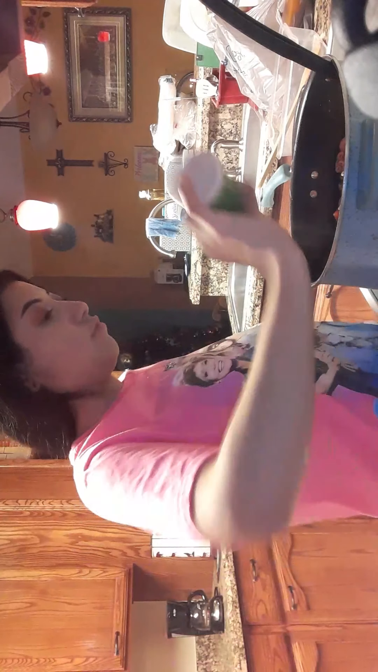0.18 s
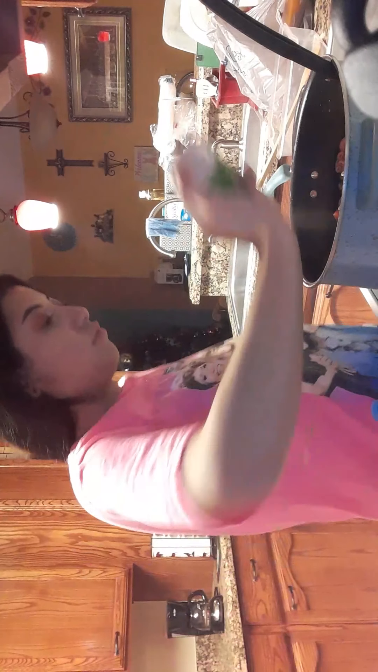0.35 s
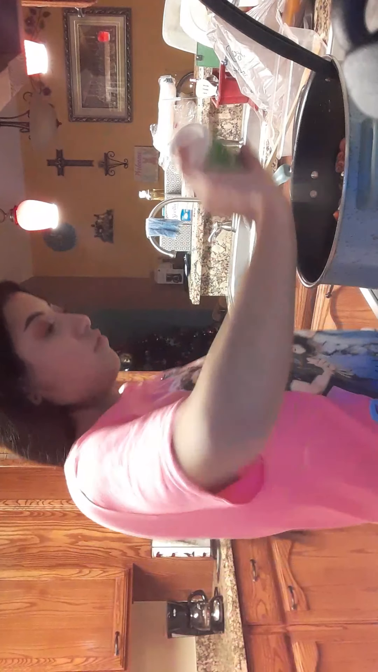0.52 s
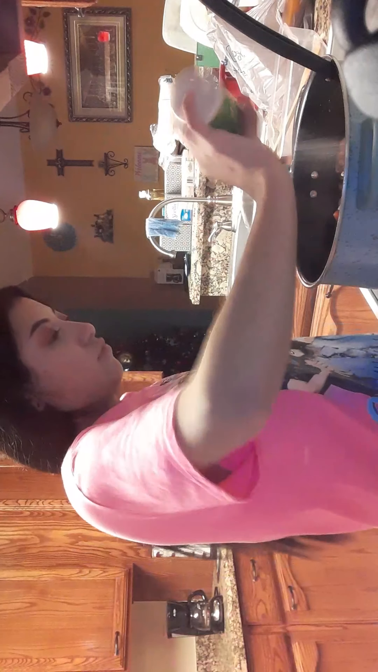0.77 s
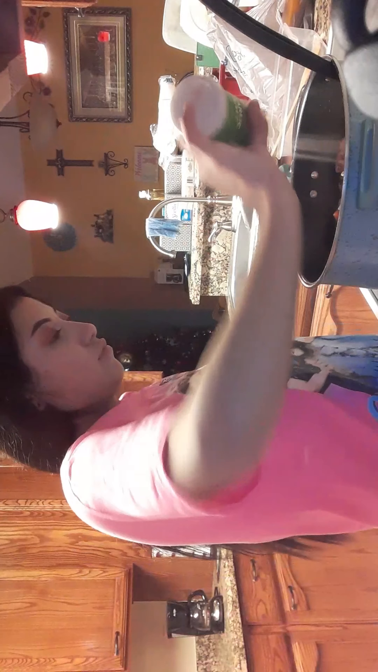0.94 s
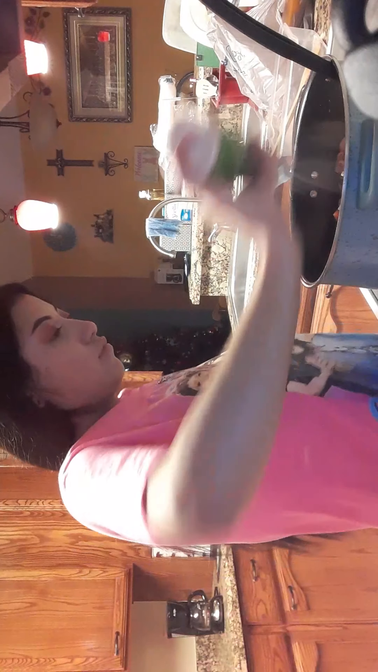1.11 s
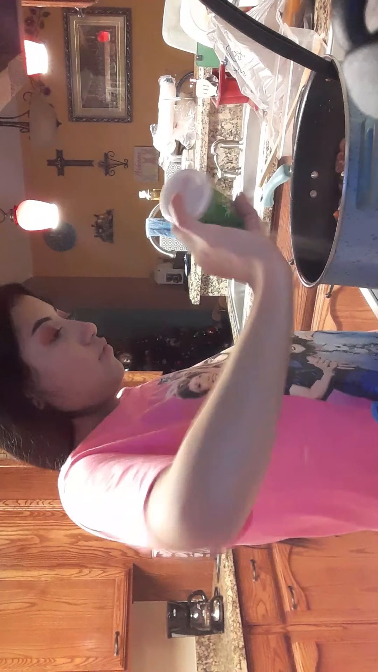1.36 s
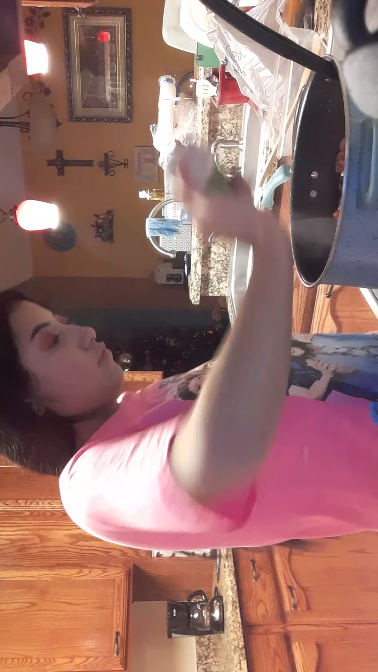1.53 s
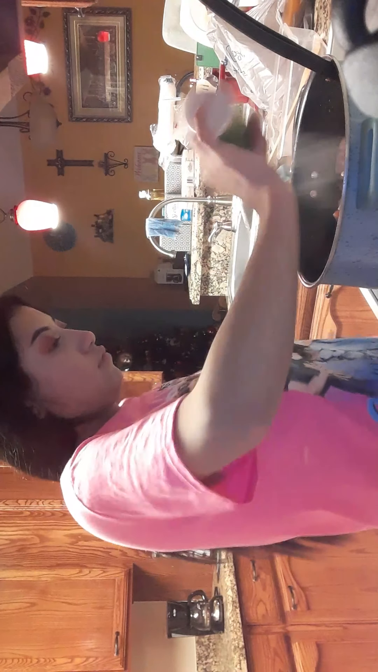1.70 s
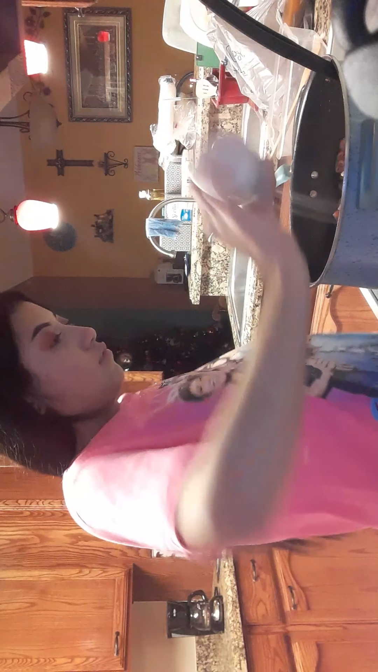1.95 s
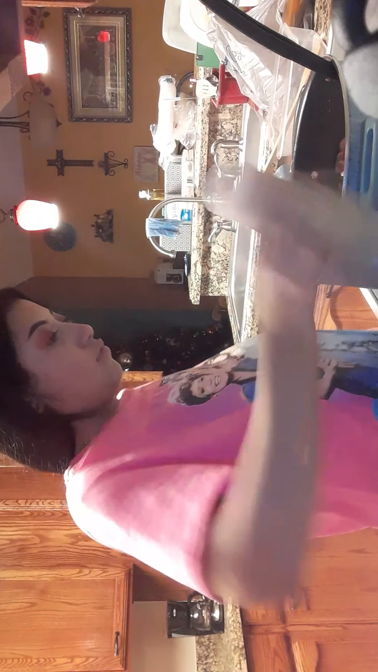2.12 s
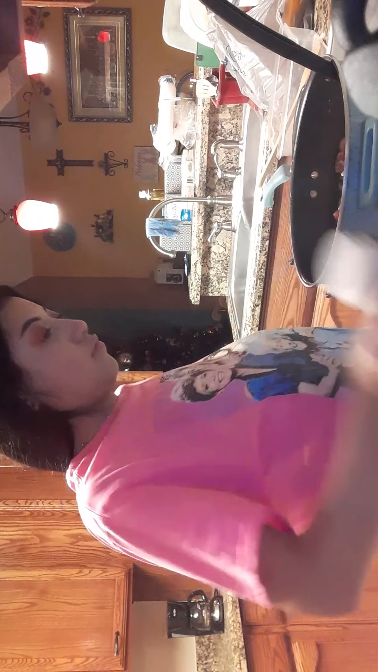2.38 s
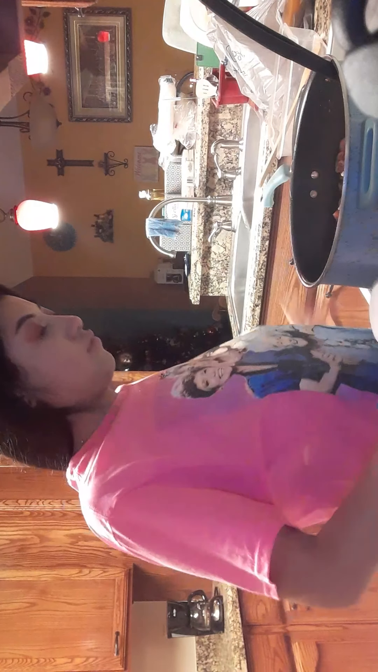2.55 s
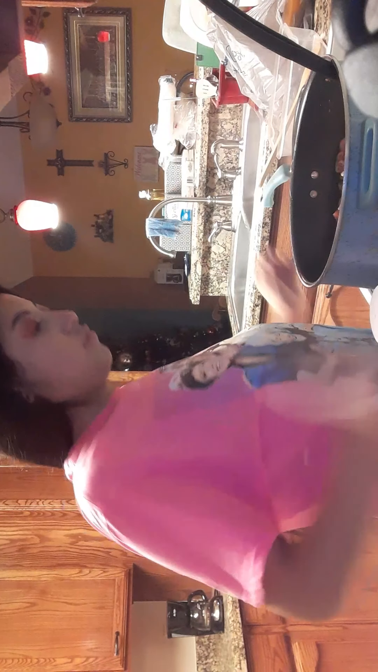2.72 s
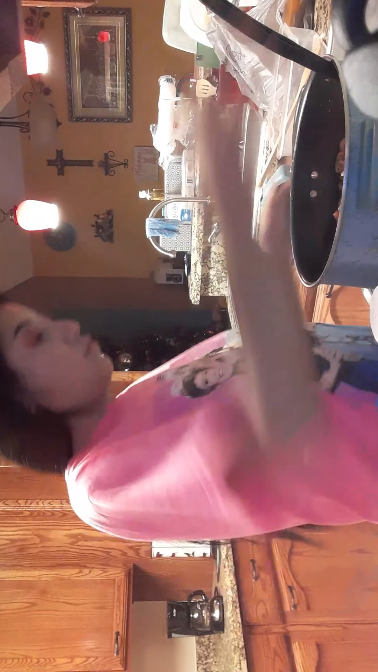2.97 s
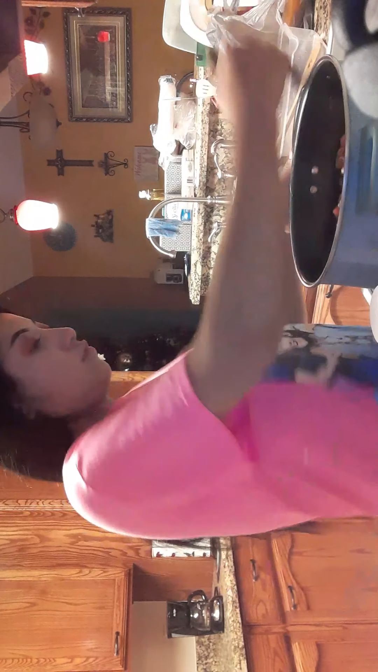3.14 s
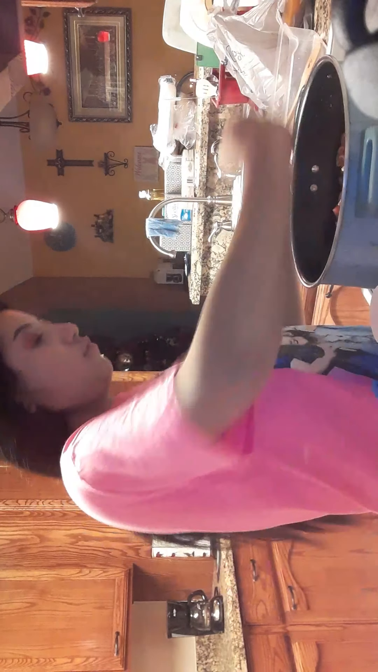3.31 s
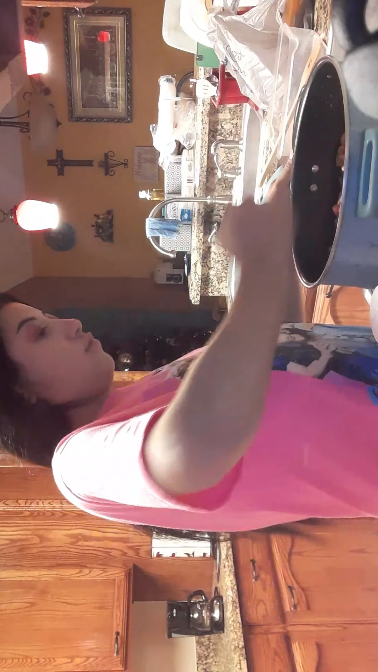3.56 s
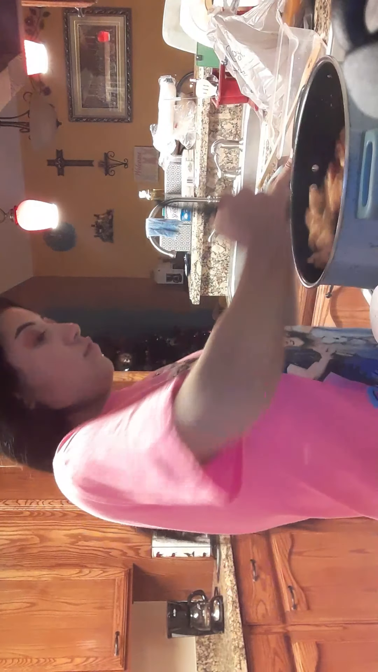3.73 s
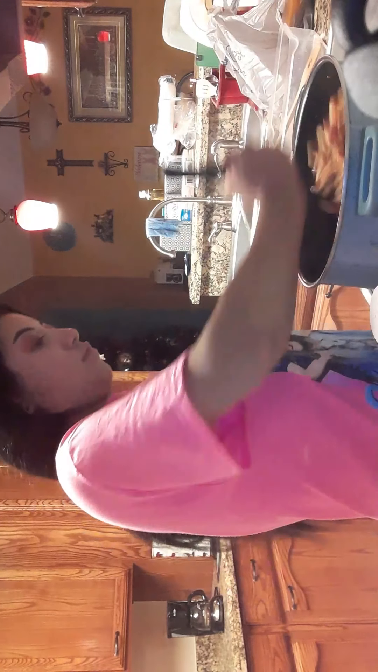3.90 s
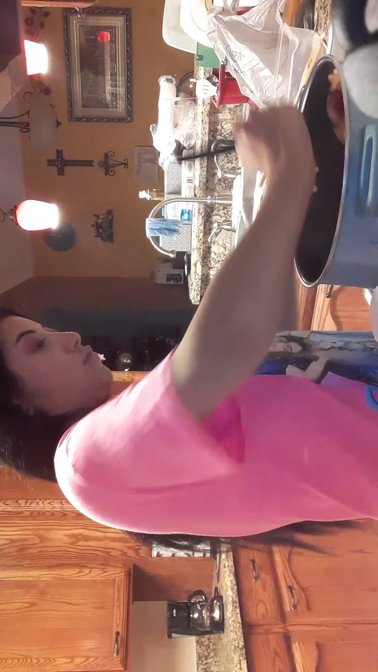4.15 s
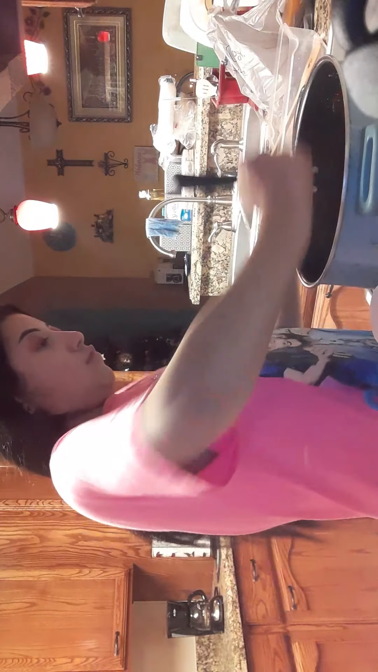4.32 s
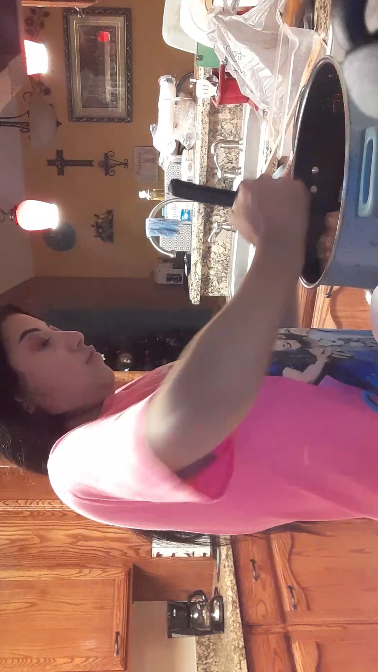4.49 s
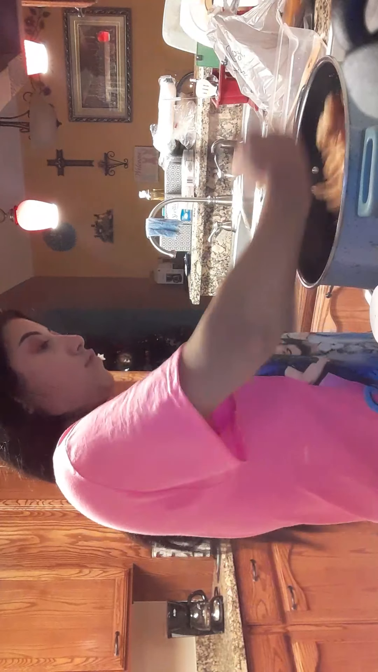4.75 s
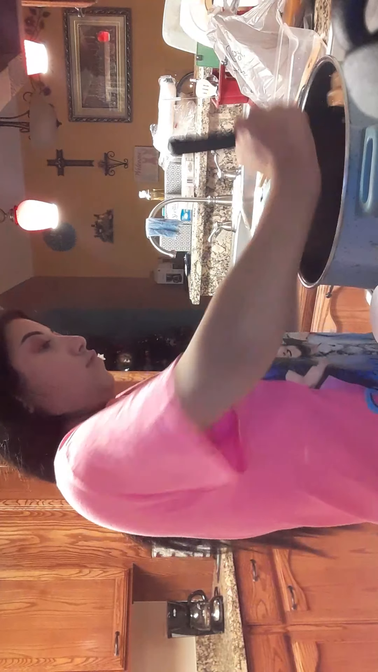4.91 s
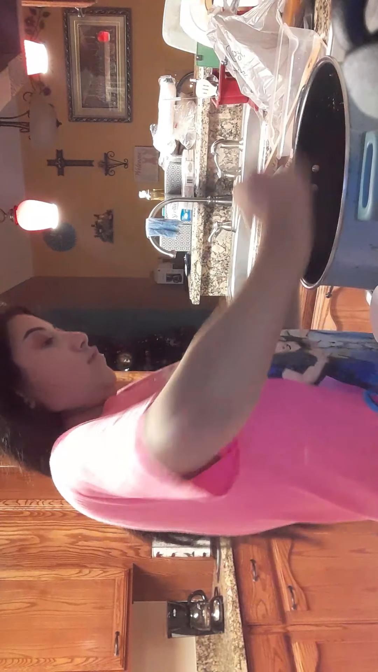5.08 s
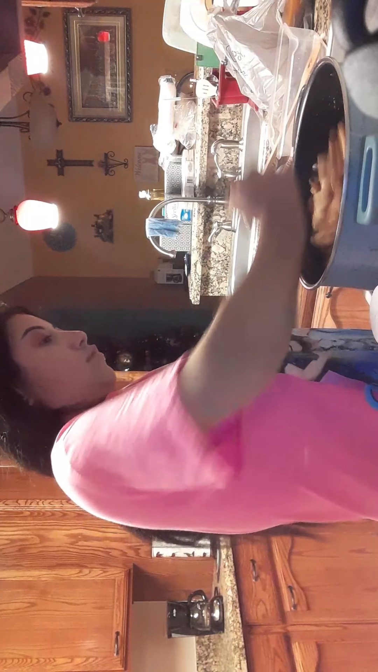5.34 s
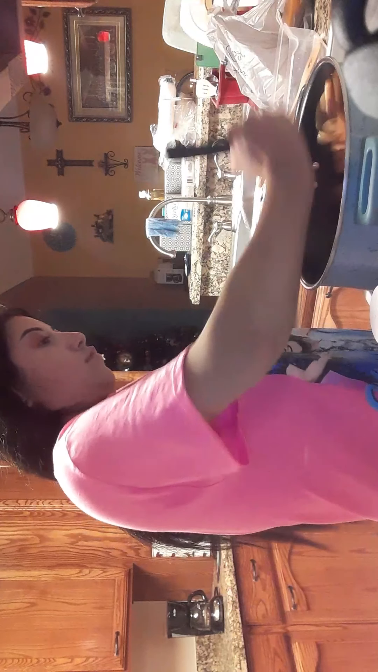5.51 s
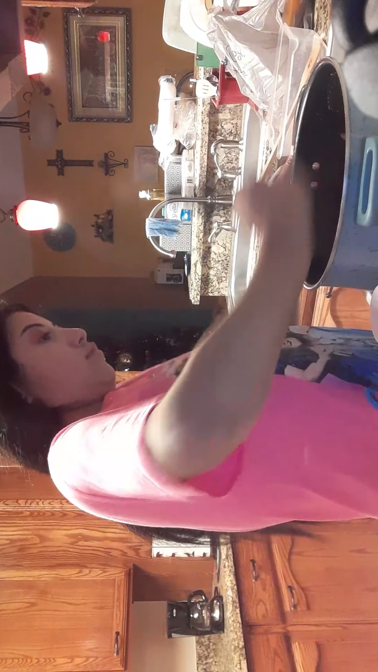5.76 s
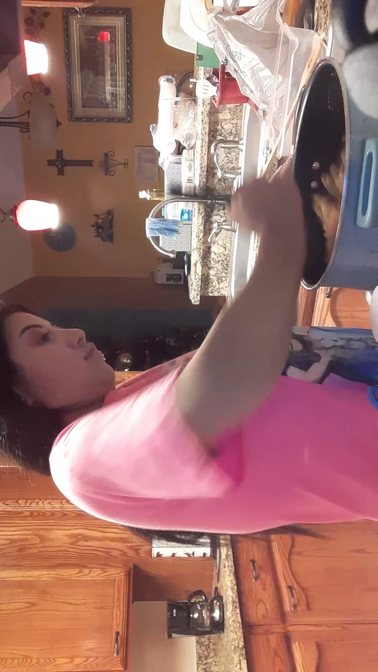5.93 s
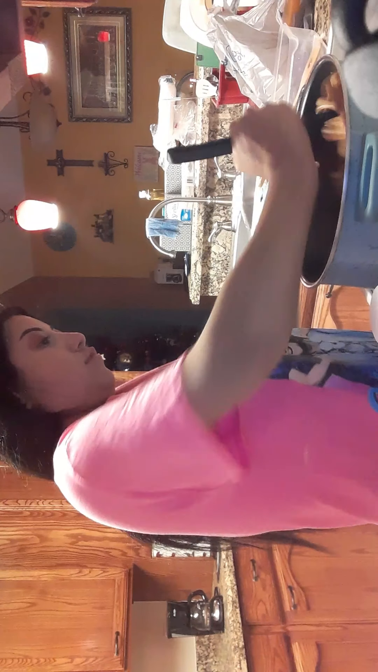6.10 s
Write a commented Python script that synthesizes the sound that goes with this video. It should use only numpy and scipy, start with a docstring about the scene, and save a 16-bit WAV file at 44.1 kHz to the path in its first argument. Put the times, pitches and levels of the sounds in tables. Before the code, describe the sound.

A shaker hisses rhythmically over a pot, gets thumped down close by with a rattle, then a utensil squelches and scrapes through moist food.

```python
"""In a small kitchen, a plastic shaker of seasoning is shaken over a pot: bursts of tiny random impacts.
It is then set down on the counter close by: fading tones make the knock, a shower of grains the rattle.
A utensil turns the moist food: resonant grains scrape, short tone bursts squelch and softly sizzle.
Light clacks ring briefly; appliances hum with steady tones over filtered noise."""
import sys
import numpy as np
from scipy import signal
from scipy.fft import rfft, irfft, next_fast_len
from scipy.io import wavfile
from scipy.ndimage import map_coordinates

SR = 44100
rng = np.random.default_rng(int(sys.argv[2]) if len(sys.argv) > 2 else 0)


def pcm_store(signal):
    """Save signal as 16-bit PCM."""
    levels = np.round(np.clip(np.atleast_2d(signal), -1, 1) * 32767)
    wavfile.write(sys.argv[1], SR, levels.astype(np.int16).T)


N = 272097
TOP_HZ = 15700  # nothing is kept above this frequency

# The shaker lands on one edge, then flat: t/s, thump/dB, rattle/dB, skitter/dB, shell/dB
LANDINGS = [(2.4453, -7.5, -23, -31, -20.5), (2.5363, -34, -21.5, -37.5, -26)]


def shaker():
    """Each shake throws the seasoning against the wall; the back swing returns it more softly."""
    # Quick shakes, then slower tosses:
    # middle t/s, level/dB, length/s, slide/s for a 20 dB rise, back swing/dB below the peak
    shakes = [(.004, -38.5, .01, .05, 8), (.201, -38, .014, .04, 9.5), (.399, -38.5, .026, .042, 7.5),
              (.595, -41, .03, .035, 6.5), (.803, -40.5, .006, .095, 15), (1.143, -45.5, .06, .025, 20),
              (1.33, -54, .04, .12, 6), (1.845, -42, .01, .105, 20), (2.088, -39, .02, .18, 15)]
    # Tone colour of the seasoning: f/Hz, relative level/dB
    seasoning = [(710, -42), (1200, -10), (2260, -10), (2770, -10.5), (3400, -1.5), (3820, -6.5),
                 (5160, -2), (6470, -4), (11600, 6), (14900, 2.5), (15600, -27)]
    back_delay_s, back_length_s, back_slide_s = 0.12, 0.02, .045
    power = np.zeros(N)
    for s, db, length, slide, softer_db in shakes:
        power += surge(s, db, length, slide)
        power += surge(s + back_delay_s, db - softer_db, back_length_s, back_slide_s)
    granules = grains(rate=7000, scatter_db=3) + .55 * noise()
    flutter = amp(1.3 * wobble(130))
    return np.sqrt(power) * flutter * coloured(granules, seasoning)


def surge(s, db, length, slide):
    """Power of seasoning that slides towards the wall, pours against it around time s and settles."""
    settle_s = .06  # time to fall by 20 dB
    before = s - length / 2 - clock()
    after = clock() - s - length / 2
    steps_down = np.clip(np.maximum(before / slide, after / settle_s), 0, 10)
    return amp(db - 20 * steps_down) ** 2


def thumps():
    """The shaker's base pushes the counter, whose deeper tones take longer to swell."""
    # Tones of the counter top: f/Hz, relative level/dB, time to fade by 60 dB/s, left minus right/dB
    counter = [(65.3, -10.5, 0.27, 1.5), (98.6, -10, 0.32, -1), (121.4, -11.5, 0.18, 2),
               (148.7, -23.5, 0.5, -5), (197.7, -10, 0.12, 6), (226, -5, 0.12, -6), (271, 6, 0.036, -2),
               (352, 6.5, 0.021, 2), (334, -10.5, 0.06, -8), (400, -8.5, 0.072, -2),
               (471, -3.5, 0.052, -6.5), (697, -25, 0.14, 2)]
    t = clock()
    ring = np.zeros((2, N))
    swell_cycles = .55
    for s, thump_db, *_ in LANDINGS:
        for hz, db, t60, lean_db in counter:
            gain = amp(thump_db + db + lean_db * np.array([[.5], [-.5]]))
            envelope = struck(s, t60, attack=swell_cycles / hz)
            ring += gain * envelope * np.sin(2 * np.pi * hz * (t - s))
    # the soft contact leaves out the treble, and the slab radiates little deep bass
    low_hz, high_hz = 54, 575
    contact = signal.butter(4, [low_hz, high_hz], "bandpass", fs=SR, output="sos")
    return -signal.sosfilt(contact, ring)


def rattles():
    """Each landing rings the plastic shell and throws the seasoning against the bottom."""
    # Tones of the plastic shell: f/Hz, relative level/dB, time to fade by 60 dB/s
    shell_tones = [(1168, -17, 0.064), (1300, -16.5, 0.1), (1920, -9, 0.046), (2045, -2, 0.029),
                   (2930, -13.5, 0.024), (3190, -11, 0.03), (4420, -12, 0.033), (4850, -16.5, 0.041),
                   (5330, -12, 0.043)]
    # Tone colour of the rattle: f/Hz, relative level/dB
    rattle_colour = [(600, -11), (1000, -9), (2100, -7), (2700, -6.5), (4300, -6.5), (6800, -8.5),
                     (8900, -3.5), (10400, -5), (12200, -1.5), (14400, -4.5), (15800, -11)]
    crack_t60_s, skitter_t60_s = 0.045, .2  # the seasoning hits at once, then skitters to rest
    t = clock()
    shell = np.zeros((2, N))
    level = np.zeros(N)
    for s, _, rattle_db, skitter_db, shell_db in LANDINGS:
        for hz, db, t60 in shell_tones:
            tone = np.sin(2 * np.pi * (hz * t + rng.random((2, 1))))
            shell += amp(shell_db + db) * struck(s, t60, attack=.0005) * tone
        crack = amp(rattle_db) * struck(s, crack_t60_s, attack=0.00064)
        skitter = amp(skitter_db) * struck(s, skitter_t60_s, attack=.003)
        level += np.hypot(crack, skitter)
    shower = grains(rate=14000, scatter_db=3)
    return shell + level * coloured(shower, rattle_colour)


def clacks():
    """Light contacts, each a short burst in one resonance with a little clear ring."""
    # Contacts of shaker and utensil: t/s, level/dB, resonance f/Hz, time to fade by 60 dB/s
    contacts = [(0.3203, -38, 2100, 0.065), (0.323, -37.5, 3500, 0.15), (.321, -37, 7500, .07),
                (2.843, -46.5, 4380, 0.07), (2.844, -51.5, 990, 0.22), (3.049, -45, 11800, 0.08),
                (3.115, -49, 10400, .2), (3.3164, -47, 3350, 0.17), (3.417, -43, 2650, 0.066),
                (3.6108, -41, 2700, .06), (3.615, -44, 9700, .18), (3.8976, -42, 10000, 0.055),
                (4.085, -46, 8100, 0.11), (4.497, -39.5, 8600, 0.07), (4.5766, -35, 8000, 0.041),
                (5.598, -43, 1414, 0.081), (5.826, -44, 1714, .07), (5.8611, -42, 3830, 0.051),
                (6.0818, -36.5, 2920, 0.046), (6.145, -47.5, 1450, 0.074)]
    out = np.zeros((2, N))
    for s, db, hz, t60 in contacts:
        body = unit(filtered(noise(), lambda f: resonance(f, hz, width=0.45 * hz) ** 2))
        ring = .35 * np.sin(2 * np.pi * (hz * clock() + rng.random((2, 1))))
        out += amp(db) * struck(s, t60, attack=0.00045) * (body + ring)
    return out


def stirring():
    """The utensil scrapes the pot's floor and rings its wall; wet food squelches and sizzles as it turns."""
    # Resonances of scraping in the loaded pot: f/Hz, width/Hz, relative level/dB
    pot_modes = [(510, 82, 0), (992, 163, 0), (1060, 144, 2), (1840, 1060, -11.5)]
    # Tone colours of wet food, sizzle and grit: f/Hz, relative level/dB
    squelch_colour = [(900, -47), (1800, -8), (2500, 0), (3500, 2), (4900, 1), (6500, -8.5), (10000, -8)]
    sizzle_colour = [(2500, -5), (5500, -5), (8000, 0.5), (9700, 0), (12000, 2), (15500, -5.5)]
    grit_colour = [(1000, -22), (3500, 0), (9000, -6), (15500, -14)]
    start_s, fade_s = 3.17, 0.1  # the utensil enters the food
    mean_sizzle_db, sizzle_follows = -51, 0.86  # the second: dB gained per dB of food moved
    grit_db = -13  # against the squelch
    begun = np.clip((clock() - start_s) / fade_s, 0, 1)
    squelch_db, scrape_db, ring_db = stroke_levels()
    mean_squelch_db = np.average(squelch_db, weights=begun)
    sizzle_db = mean_sizzle_db + sizzle_follows * (squelch_db - mean_squelch_db)

    def pot(f):
        """The pot's resonances added with alternating signs."""
        return sum((-1) ** k * amp(db) * resonance(f, hz, width)
                   for k, (hz, width, db) in enumerate(pot_modes))

    wall = lambda f: resonance(f, hz=1440, width=290) ** 2
    slips = wobble(40)  # the utensil catches and slips
    floor_grains = filtered(grains(rate=1600, scatter_db=3.5), pot)
    scrape = amp(scrape_db + 1.1 * slips) * spread(floor_grains)
    wall_grains = filtered(grains(rate=900, scatter_db=2.5), wall)
    ring = amp(ring_db + 1.5 * wobble(35)) * spread(wall_grains)
    bubbles = pops(rate=570, centre_hz=3365, octaves=0.78, cycles=3.7, scatter_db=2)
    spits = pops(rate=600, centre_hz=9600, octaves=0.85, cycles=8.7, scatter_db=3.5)
    squelch = amp(squelch_db + 1.0 * slips) * coloured(bubbles + 2.7 * noise(), squelch_colour)
    sizzle = amp(sizzle_db + 2.2 * wobble(54)) * coloured(spits + 2.3 * noise(), sizzle_colour)
    # coarse grit: single small ticks, louder in stronger strokes
    ticks = grains(rate=70, scatter_db=-0.5)
    grit = amp(squelch_db + grit_db) * coloured(ticks, grit_colour)
    return begun * (scrape + ring + squelch + sizzle + grit)


def stroke_levels():
    """Levels in dB of food, scrape and ring: every stroke swells and fades over a light steady drag."""
    # Strokes of the utensil: middle t/s, length/s at half power, food/dB, floor scrape/dB, wall ring/dB
    strokes = [(3.34, 0.064, -56, -56.5, -61), (3.497, 0.12, -54, -59, -66),
               (3.651, 0.08, -48.5, -44.5, -54), (3.844, .12, -55.5, -61.5, -69),
               (4.182, 0.14, -49.5, -51.5, -53), (4.478, 0.21, -50, -51.5, -60),
               (4.753, .08, -59, -55, -69), (4.94, 0.16, -54, -55, -55), (5.216, .14, -50.5, -56, -68),
               (5.44, .08, -56, -60, -77), (5.606, 0.15, -50, -58, -54), (5.85, 0.086, -48.5, -53, -57.5),
               (6.068, 0.13, -51.5, -57.5, -60)]
    drag_food_db, drag_scrape_db, drag_ring_db = -55, -67, -71
    t = clock()
    power = amp([[drag_food_db], [drag_scrape_db], [drag_ring_db]]) ** 2
    for s, length, *levels_db in strokes:
        swell = .5 ** ((2 * (t - s) / length) ** 2)
        power = power + amp(levels_db)[:, None] ** 2 * swell
    return 10 * np.log10(power)


def pops(rate, centre_hz, octaves, cycles, scatter_db):
    """Small wet bubbles burst, each ringing a few cycles at its own pitch."""
    count = int(rate * N / SR)
    when, pitch, size, side = rng.random((4, 4000, 1))[:, :count]
    age = np.arange(SR // 50) / SR
    hz = np.minimum(centre_hz * 2 ** (octaves * (2 * pitch - 1)), TOP_HZ)
    loudness = amp(scatter_db * np.minimum(-np.log(size), 4))  # a few stand out
    fade = np.exp(-age * hz / cycles)
    bursts = loudness * np.sqrt(hz) * fade * np.sin(2 * np.pi * hz * age)
    index = ((when * N).astype(int) + np.arange(len(age))).ravel()
    # a random angle shares each burst between left and right
    channels = [np.bincount(index, (bursts * turn(2 * np.pi * side)).ravel(), N)[:N]
                for turn in (np.cos, np.sin)]
    return unit(np.array(channels))


def appliances():
    """Steady mains and motor tones over the rumble of moving air and a fine hiss."""
    # Mains and motor tones: f/Hz, level/dB (rms)
    hum_lines = [(60, -55), (101.5, -58), (120.05, -44.5), (161, -61.5), (201.3, -47), (252, -63),
                 (402.6, -64.5)]
    # Tone colours of the air rumble and the hiss: f/Hz, relative level/dB
    air_colour = [(20, -28), (35, -23), (50, -13.5), (65, -7.5), (92, 0), (128, 1.5), (143, -16.5),
                  (190, -6), (240, -12), (330, -10), (380, -16), (510, -17.5), (750, -23.5), (1500, -40.5)]
    hiss_colour = [(470, -13), (800, -9.5), (1320, -9.5), (1770, -10), (2060, -8), (2360, -8), (2670, -9.5),
                   (5360, -11), (7130, -13.5), (9610, -7.5), (15600, -9)]
    t = clock()
    hum = np.zeros(N)
    for hz, db in hum_lines:
        level = np.sqrt(2) * amp(db + 0.51 * wobble(3.26))
        hum += level * np.sin(2 * np.pi * (hz * t + rng.random()))
    rumble = amp(-44) * coloured(noise(), air_colour)
    grainy = noise() + 0.28 * grains(rate=700, scatter_db=8.5)
    hiss = amp(-51.5 + 0.18 * wobble(7.8)) * coloured(grainy, hiss_colour)
    return hum + rumble + hiss


def room(x):
    """The kitchen's answer: a noise tail in which each frequency dies at its own speed."""
    # Echo of the kitchen: f/Hz, time to fade by 60 dB/s
    kitchen = [(100, 0.4), (500, 0.42), (3000, 0.26), (14000, 0.086)]
    hz, t, z = signal.stft(rng.standard_normal((2, SR // 2)), SR, nperseg=256)
    fade = amp(-60 * t / along(kitchen, hz)[:, None])
    tail = signal.istft(z * fade, SR, nperseg=256)[1]
    tail = tail / np.linalg.norm(tail[0])
    tail = np.pad(tail, ((0, 0), (SR // 200, 0)))  # starts 5 ms late
    return signal.fftconvolve(x, tail, axes=1)[:, :N]


def struck(s, t60, attack):
    """Envelope of a blow at time s: a quick rise times a fade of 60 dB in t60 seconds."""
    age = np.maximum(clock() - s, 0)
    return (1 - np.exp(-age / attack)) * amp(-60 * age / t60)


def grains(rate, scatter_db):
    """Tiny impacts at random times, rate a second, of scattered size."""
    hits = rng.random(N) < rate / SR
    sizes = hits * amp(scatter_db * np.clip(rng.standard_normal(N), -2, 2))
    return unit(sizes * noise())


def noise():
    """Two channels of white noise."""
    return rng.standard_normal((2, N))


def wobble(rate):
    """A smooth random curve through rate random points a second."""
    points = rng.standard_normal(int(N * rate / SR) + 4)
    return map_coordinates(points, [clock() * rate])


def resonance(f, hz, width):
    """Frequency response of one ringing tone, like a mass on a spring."""
    return 1j * f * width / (hz * hz - f * f + 1j * f * width)


def coloured(pair, spectrum):
    """Stereo texture of rms 1 with the given tone colour."""
    return spread(filtered(pair, lambda f: amp(along(spectrum, f))))


def spread(pair):
    """Two unrelated signals become left and right, alike in the bass only."""
    # Likeness of the two sides: f/Hz, likeness (1 = the same, 0 = unrelated)
    alike = [(60, 1), (250, 0.6), (500, 0.48), (1000, 0), (3000, 0), (15000, 0)]
    turn = lambda f: np.arccos(np.clip(along(alike, f), -1, 1)) / 2
    mid, side = filtered(pair, lambda f: np.array([np.cos(turn(f)), np.sin(turn(f))]))
    return unit(np.array([mid + side, mid - side]))


def filtered(x, response):
    """x with each frequency multiplied by a response, which may be complex."""
    size = next_fast_len(N + SR // 2)  # silence after the end gives ringing room to die
    return irfft(rfft(x, size) * response(np.fft.rfftfreq(size, 1 / SR)), size)[..., :N]


def along(points, hz):
    """Values between (f/Hz, value) points, read on a log frequency axis."""
    f, v = np.transpose(points)
    return np.interp(np.log(hz + 1), np.log(f + 1), v)


def unit(x):
    """x at rms 1."""
    return x / np.sqrt(np.mean(x ** 2) + 1e-20)


def amp(db):
    """Decibels to gain."""
    return 10 ** (np.asarray(db) / 20)


def clock():
    """The time of every sample in seconds."""
    return np.arange(N) / SR


def scene():
    """Close counter sounds are nearly dry; those at the pot carry more room."""
    # Balance of the whole sound: f/Hz, left minus right/dB
    balance = [(60, 3), (125, 0.5), (250, 11.5), (380, -2), (620, 1), (1200, 4), (2400, 2), (4400, 2),
               (8000, 2.5), (14000, -0.5)]
    at_pot = shaker() + clacks() + stirring()
    thump, rattle = thumps(), rattles()
    echo = room(amp(-10) * at_pot + amp(-18.5) * thump + amp(-16) * rattle)
    mix = at_pot + thump + rattle + echo + appliances()
    return filtered(mix, lambda f: amp(np.array([[.5], [-.5]]) * along(balance, f)))


def record(dry):
    """The very highest peaks are rounded off and nothing above the top frequency is kept."""
    rounded = dry / (1 + np.abs(dry / .85) ** 4) ** (1 / 4)
    return filtered(rounded, lambda f: f < TOP_HZ)


dry = scene()
out = record(dry)
pcm_store(out)
```